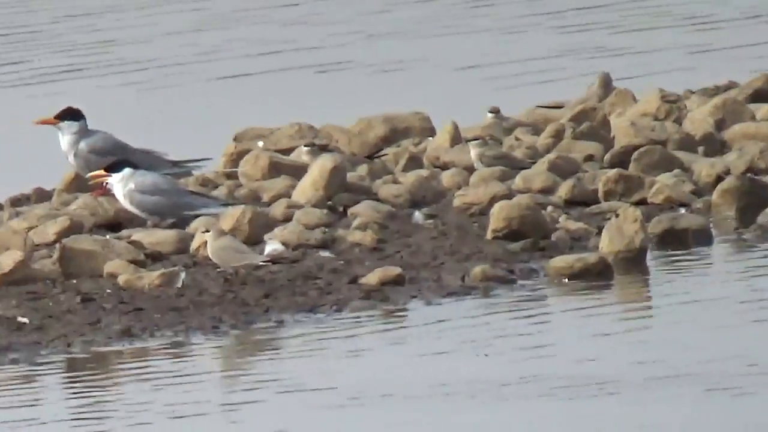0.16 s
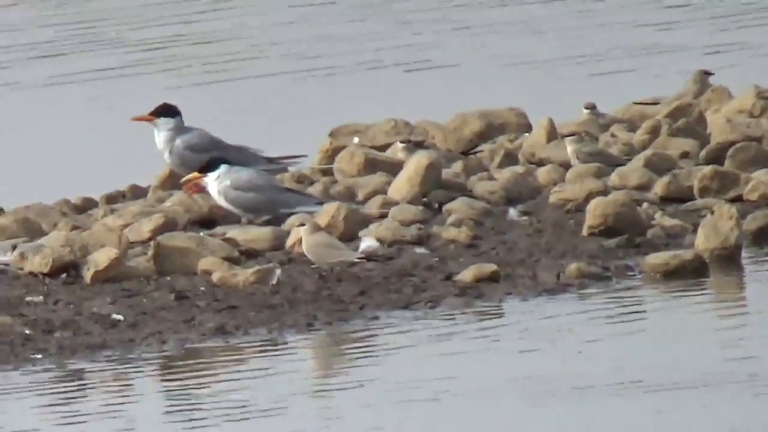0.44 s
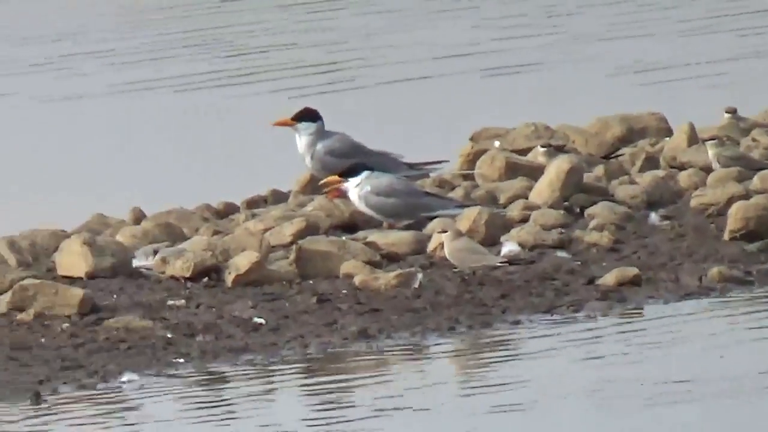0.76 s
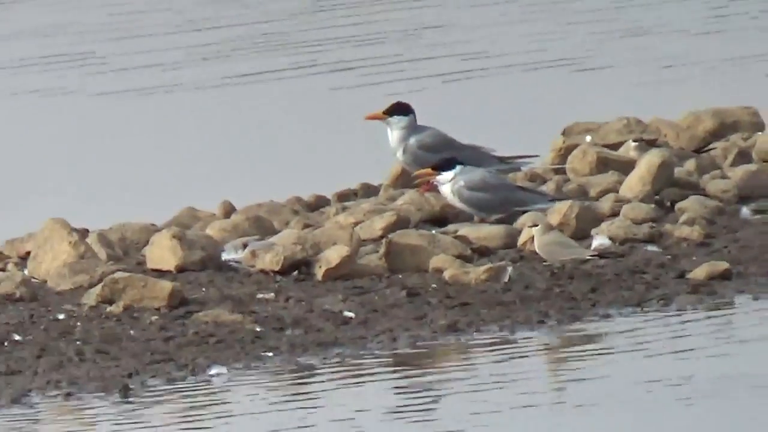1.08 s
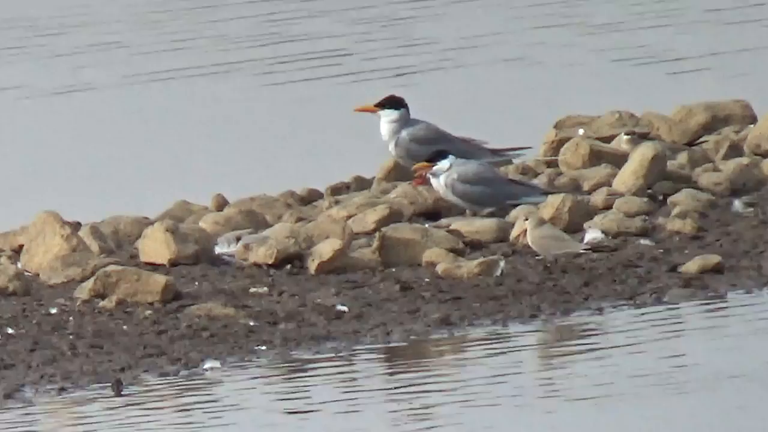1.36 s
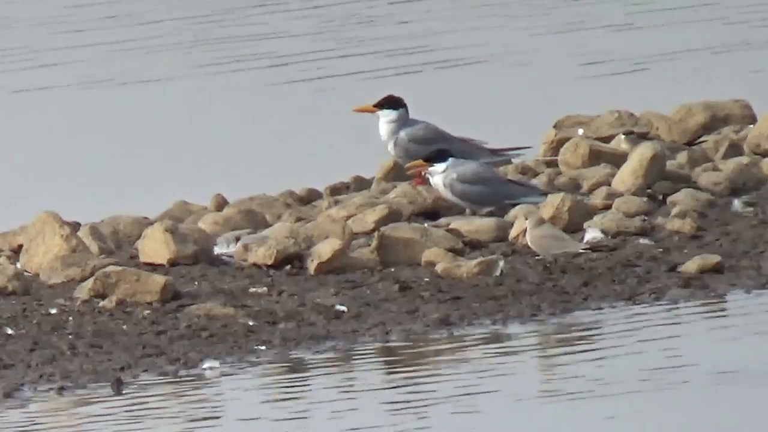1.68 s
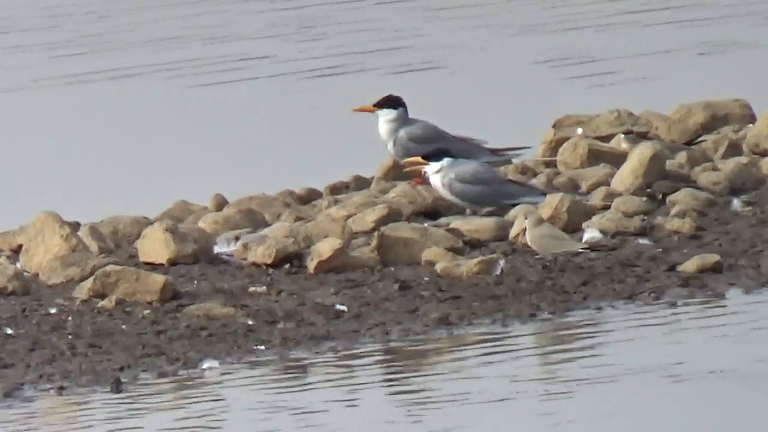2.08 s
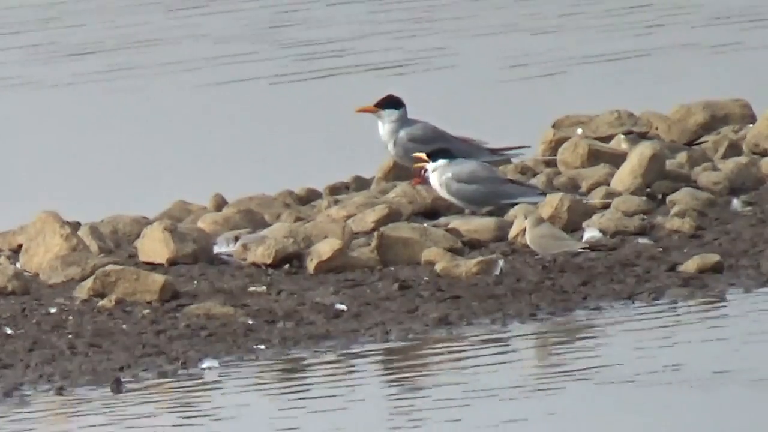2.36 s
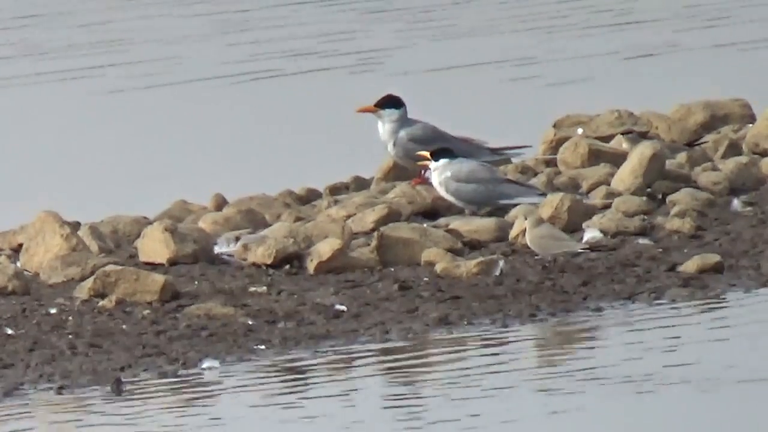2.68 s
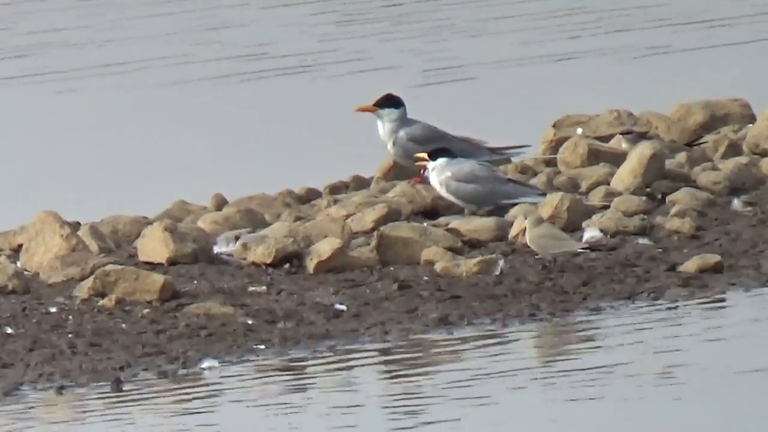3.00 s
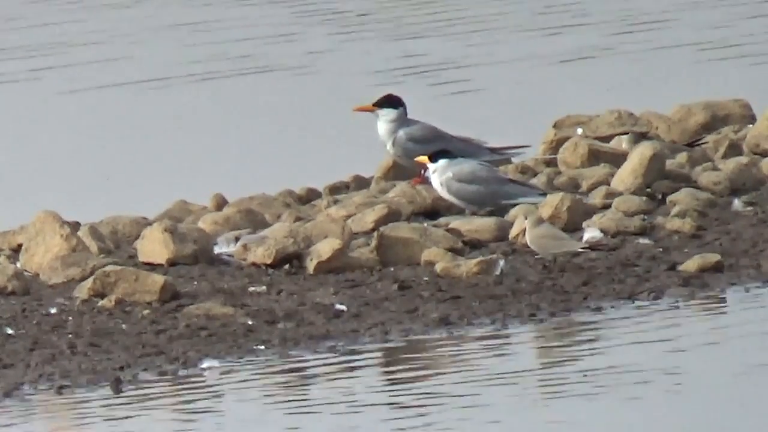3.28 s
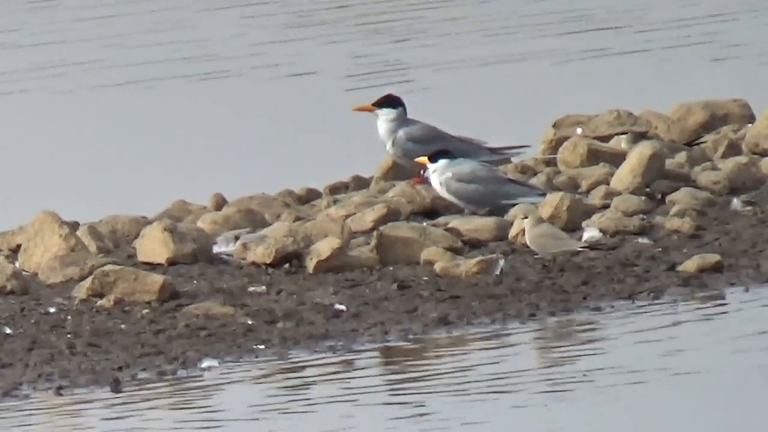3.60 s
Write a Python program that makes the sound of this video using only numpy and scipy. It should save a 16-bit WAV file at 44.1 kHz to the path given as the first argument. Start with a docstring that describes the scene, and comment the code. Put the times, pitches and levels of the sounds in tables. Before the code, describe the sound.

A tern repeats short raspy calls over soft breeze, with light handling clicks.

```python
"""A tern on a stony riverbank repeats short arched calls, a harmonic voice that ends in a rasp and is
often led by a softer rising note. Far off a small wader peeps in thin whistles; the stones scatter both.
Underneath, one low tone throbs like a faint motor in the airy hiss of breeze and river.
Handling close to the microphone adds a grainy rustle, soft knocks, scuffs, hollow bumps and snaps of
the casing, with two drip-like plinks near the start."""
import sys
import numpy as np
from scipy import signal
from scipy.fft import rfft, irfft
from scipy.io import wavfile

SR = 44100
rng = np.random.default_rng(int(sys.argv[2]) if len(sys.argv) > 2 else 0)


def wrap_up_sound(samples):
    """Save the sound to the file named by the first command line argument, as 16-bit audio."""
    columns = np.atleast_2d(samples).T
    # keep every value between -1 and 1, then stretch to whole-number steps
    tamed = np.clip(columns, -1, 1)
    steps = np.round(tamed * 32767).astype(np.int16)
    wavfile.write(sys.argv[1], SR, steps)


N = 164934

# fader ride of the hum (time [s], level [dB])
HUM_LEVEL = [(0, -53), (.2, -54), (.5, -50.5), (.72, -54), (1, -52), (1.3, -53), (1.9, -50.5), (2.43, -51),
             (2.58, -58), (2.76, -51), (3.5, -51.5), (3.74, -56)]
# how deeply the hum throbs (time [s], depth [dB])
THROB_DEPTH = [(0, -10), (.42, -20), (.9, -21), (1.55, -16), (2.3, -25), (2.7, -12.5), (3.74, -31)]
# tone colour of the air (frequency [Hz], relative level [dB])
AIR_SPECTRUM = [(25, -13), (60, -8.5), (120, -2.5), (210, 8.5), (300, 0.5), (500, -6), (1200, -7.5),
                (2500, -11), (5000, -17.5), (8000, -19.5), (11000, -28.5)]
# extra EQ on the air's side signal, shaping its width (frequency [Hz], gain [dB])
AIR_SIDE_EQ = [(60, 3), (170, -35), (260, -3), (700, 15), (1500, 11), (4000, 14)]
# noise bands of the rustle (low edge [Hz], high edge [Hz], level before the fader [dB])
RUSTLE_BANDS = [(231, 650, -69.5), (570, 1370, -64.5), (1410, 4200, -62), (4030, 8100, -64.5)]
# fader ride of the rustle (time [s], gain [dB])
RUSTLE_FADER = [(0, -7), (.25, -6), (.55, -5), (.78, -5), (1.08, -10), (1.22, -1), (1.48, 1), (1.72, -2),
                (1.85, 2.5), (2.04, 0), (2.28, 0), (2.46, 0), (2.64, -5), (2.82, -4), (3, -11), (3.74, -15)]
# fader ride of the sizzle on top of the rustle (time [s], level [dB])
SIZZLE_LEVEL = [(0, -69), (.22, -67), (.35, -71), (.62, -65.5), (.8, -69.5), (1, -72), (1.16, -76),
                (1.235, -60), (1.5, -57.5), (1.64, -63.5), (1.79, -59), (2.02, -65), (2.35, -64.5),
                (2.7, -73.5), (2.82, -69.5), (3, -77), (3.74, -76)]
# distant wader peeps (start [s], length [s], level [dB])
PEEPS = [(0.078, 0.048, -63.5), (.245, 0.039, -57), (0.417, 0.041, -59.5), (0.589, 0.038, -58),
         (0.755, 0.033, -60), (0.915, 0.031, -61), (1.094, 0.028, -62), (1.61, 0.042, -70)]
# handling knocks (start [s], body level [dB], middle level [dB], treble level [dB])
KNOCKS = [(0.0856, -85, -39, -44), (0.132, -62, -50, -66), (0.181, -50, -61, -63), (0.292, -67, -70, -49.5),
          (0.5594, -53, -49, -58), (1.653, -60, -48, -56), (1.8157, -55, -43, -41.5),
          (1.819, -55, -52, -42), (2.075, -46.5, -59, -60), (2.1017, -42, -45, -52),
          (2.1108, -50, -45, -50), (2.117, -46, -44.5, -46), (2.359, -63, -58, -48.5),
          (2.471, -40.5, -45, -67), (2.536, -45.5, -45.5, -61), (2.5576, -58, -45, -51),
          (2.809, -55, -51, -56), (2.921, -54, -44, -67)]
# body, middle and treble of a knock (low edge [Hz], high edge [Hz], T60 [s])
KNOCK_BANDS = [(477, 1740, 0.022), (1650, 4400, 0.014), (4940, 12400, 0.014)]
# drip-like ticks (start [s], level [dB], starting pitch [Hz])
PLINKS = [(0.0866, -25, 3320), (0.1642, -43, 3900)]
# tern calls (arch start [s], arch length [s], top pitch [Hz], level [dB], 3rd harmonic [dB],
# 4th harmonic [dB], 5th harmonic [dB], lead note length or 0 for none [s], lead note gain [dB]);
# harmonics are set against the 2nd, ahead of the beak resonance
TERN_CALLS = [(0.224, 0.04, 1287, -55, -9, -10, -16, 0.035, -1.5),
              (0.459, 0.046, 1280, -55, -10, -9, -16, 0.031, -5),
              (.596, 0.039, 1288, -55, -11, -8, -15, 0.017, -7),
              (0.842, 0.038, 1300, -56, -10.5, -11, -15, 0.026, -4),
              (.919, 0.035, 1264, -57, -9, -6, -11, 0.0036, -4),
              (1.178, 0.043, 1307, -51, -18, -1.5, -21, 0.02, -3.5),
              (1.435, 0.045, 1312, -49.5, -23, -0.5, -26, 0.023, -4.5),
              (1.826, 0.049, 1259, -50.5, -28, -2, -28, 0.026, -5),
              (1.913, 0.039, 1283, -51.5, -23, -2, -13, 0.015, -3),
              (2.204, .045, 1318, -53.5, -24, .5, -25, .023, -2.5),
              (2.285, .038, 1308, -56.5, -18, -1.5, -18, .009, -8),
              (2.533, 0.042, 1350, -57.5, -8, -7, -22, .023, -4),
              (2.612, 0.02, 1280, -63.5, -2, -13, -21, 0.0038, -3),
              (2.681, 0.032, 1310, -55.5, -8, -14, -26, 0, 0),
              (2.93, 0.047, 1343, -56.5, -9.5, -12, -23, .04, -7),
              (3.198, 0.047, 1332, -58, -9.5, -12, -15, 0.036, -5.5)]
# bright scuffs of the grip (start [s], level [dB])
SCUFFS = [(.212, -53), (0.225, -45), (0.438, -50.5), (1.792, -45), (2.104, -54), (2.1075, -47),
          (2.359, -49)]
# hollow bumps of the grip (start [s], level [dB], pitch [Hz], T60 [s])
BUMPS = [(.5595, -40, 880, 0.012), (1.816, -39.5, 694, 0.02), (2.1095, -35, 2840, 0.013),
         (2.1193, -25.5, 1770, 0.0056), (2.1235, -37.5, 1750, 0.016), (2.432, -49, 795, 0.024),
         (2.449, -41, 680, 0.03), (2.4712, -42.5, 773, 0.042), (2.922, -46, 1050, 0.021),
         (3.213, -50, 385, .07), (3.221, -52, 696, 0.051), (3.222, -44.5, 487, 0.048)]
# sharp snaps of the casing (start [s], peak level [dB])
SNAPS = [(2.0824, -45), (2.0869, -19), (2.098, -39)]
# ringing modes of the casing (frequency [Hz], relative level [dB], T60 [s])
CASING_MODES = [(2750, -13, 0.02), (3510, 14.5, 0.0026), (3930, 3.5, 0.0069), (6800, -6, 0.013),
                (7770, -1, 0.0042), (9060, -4.5, 0.0059), (10050, -12, 0.0051)]


def undb(db):
    """Decibels to gain."""
    return 10 ** (np.asarray(db) / 20)


def clock(length):
    """Sample times over a length in seconds."""
    return np.arange(int(length * SR)) / SR


def fader(points):
    """Gain over the whole scene from (time [s], level [dB]) points."""
    return undb(np.interp(np.arange(N) / SR, *np.array(points).T))


def add(out, start, sound):
    """Mix a sound in at a time in seconds."""
    i = int(start * SR)
    out[i:i + len(sound)] += sound[:N - i]


def drift(rate_hz):
    """Smooth random motion with unit spread."""
    hz = np.arange(N // 2 + 1) * SR / N
    motion = irfft(rfft(rng.standard_normal(N)) * np.exp(-(hz / rate_hz) ** 2), N)
    return motion / motion.std()


def band(low_hz, high_hz, order=2):
    """Unit noise between two edges."""
    bandpass = signal.butter(order, [low_hz, high_hz], "band", fs=SR, output="sos")
    noise = signal.sosfilt(bandpass, rng.standard_normal(N))
    return noise / noise.std()


def coloured(points):
    """Unit noise shaped by (frequency [Hz], relative level [dB]) points."""
    hz, db = np.array(points).T
    bins_hz = np.maximum(np.arange(N // 2 + 1) * SR / N, 1)
    eq = undb(np.interp(np.log(bins_hz), np.log(hz), db))
    noise = irfft(rfft(rng.standard_normal(N)) * eq, N)
    return noise / noise.std()


def decay(t, t60):
    """A tail that falls 60 dB in t60 seconds."""
    return np.exp(-np.log(1000) * t / t60)


def swell(t, length, attack_s=0.0029, release_s=0.0034):
    """Attack, hold and release of a bird's note."""
    return np.sin(np.pi / 2 * np.clip(np.minimum(t / attack_s, (length - t) / release_s), 0, 1))


def stereo(mid, side):
    """Left and right from mid and side."""
    return np.array([mid + side, mid - side])


def hum(pitch_hz=182.2, throb_hz=16.7):
    """One low, motor-like tone that throbs, now deeply and now lightly."""
    t = np.arange(N) / SR
    cycle = 2 * np.pi * throb_hz * t + 0.74 * drift(4.0)
    throb = 1 + fader(THROB_DEPTH) * (np.cos(cycle) + 0.3 * np.cos(2 * cycle))
    tone = np.sqrt(2) * np.sin(2 * np.pi * pitch_hz * t + 0.071 * drift(6.0))
    return fader(HUM_LEVEL) * throb * tone


def air(level_db=-60, side_db=-14.5):
    """A steady bed of breeze and river hiss, narrow in the bass and wider above."""
    eq_hz, eq_db = np.array(AIR_SIDE_EQ).T
    side_spectrum = [(hz, db + np.interp(np.log(hz), np.log(eq_hz), eq_db)) for hz, db in AIR_SPECTRUM]
    gain = undb(level_db + .5 * drift(7.5))
    return gain * stereo(coloured(AIR_SPECTRUM), undb(side_db) * coloured(side_spectrum))


def rustle(side_db=-13.0, grain_db=2, flicker_db=.8):
    """Grainy rubbing near the microphone, with a fine sizzle on top."""
    grain = undb(grain_db * drift(380) + flicker_db * drift(23.0))
    grain /= np.sqrt(np.mean(grain ** 2))
    body = sum(undb(db) * stereo(band(low_hz, high_hz), undb(side_db) * band(low_hz, high_hz))
               for low_hz, high_hz, db in RUSTLE_BANDS)
    sizzle = stereo(band(8950, 10940, order=3), undb(side_db) * band(8950, 10000, order=3))
    return grain * (body * fader(RUSTLE_FADER) + sizzle * fader(SIZZLE_LEVEL))


def wader(pitch_hz=2980, drop_hz=254, settle_s=0.0083):
    """Thin, pure whistles that drop onto a steady pitch."""
    out = np.zeros(N)
    for start, length, db in PEEPS:
        t = clock(length)
        hz = pitch_hz + drop_hz * np.exp(-t / settle_s)
        add(out, start, undb(db) * swell(t, length) * np.sin(2 * np.pi * np.cumsum(hz) / SR))
    return out


def bank_scatter(birds, wet_db=-16.5, t60=0.22):
    """The stones throw back a faint, short reverb, different in each ear."""
    t = clock(.3)
    tails = rng.standard_normal((2, N))[:, :len(t)] * decay(t, t60)
    wet = [signal.fftconvolve(birds, tail / np.linalg.norm(tail))[:N] for tail in tails]
    return undb(wet_db) * np.array(wet)


def knocks():
    """Dry handling knocks: three bands of noise, the lowest ringing longest."""
    out, t = np.zeros(N), clock(.05)
    for k, (low_hz, high_hz, t60) in enumerate(KNOCK_BANDS):
        envelope = np.zeros(N)
        for start, *levels_db in KNOCKS:
            add(envelope, start, undb(levels_db[k]) * decay(t, t60))
        out += envelope * band(low_hz, high_hz)
    return out


def plinks(t60=0.009, rise_hz_per_s=350000):
    """Drip-like ticks: a tiny ring that sweeps upwards as it dies."""
    out, t = np.zeros(N), clock(.06)
    for start, db, hz in PLINKS:
        attack = 1 - np.exp(-t * hz)
        chirp = np.sin(2 * np.pi * (hz + rise_hz_per_s * t / 2) * t)
        add(out, start, undb(db) * attack * decay(t, t60) * chirp)
    return out


def tern_voice(hz, phase, colour_db, beak_hz=3273, beak_width_hz=403, beak_db=15.5):
    """Eight harmonics through the beak's resonance, which lifts the third as the pitch falls."""
    third_db, fourth_db, fifth_db = colour_db
    harmonics_db = [-8.5, 0, third_db, fourth_db, *(fifth_db - 0.5 * np.arange(4))]
    voice = np.zeros(len(hz))
    for k, db in enumerate(harmonics_db, 1):
        lift_db = beak_db * np.exp(-((k * hz - beak_hz) / beak_width_hz) ** 2)
        voice += undb(db + lift_db) * np.sin(k * phase)
    return voice


def tern(crest_share=.37, end_fall=.18, rasp_db=-4, lead_gap_s=.004, shimmer=.2):
    """Most calls open on a rising note and a break; then an arch catches, crests and falls into a rasp."""
    out, wobble, flutter = np.zeros(N), drift(500), drift(250)

    def sing(start, hz, db, colour_db, jitter):
        """Lay in one note, roughened by fast tremors of pitch and level."""
        t = np.arange(len(hz)) / SR
        span = slice(int(start * SR), int(start * SR) + len(hz))
        phase = 2 * np.pi * np.cumsum(hz * (1 + jitter * wobble[span])) / SR
        envelope = undb(db) * swell(t, len(hz) / SR) * (1 + shimmer * flutter[span])
        add(out, start, envelope * tern_voice(hz, phase, colour_db))

    for start, length, top_hz, db, *colour_db, lead_s, lead_db in TERN_CALLS:
        t = clock(length)
        past_crest = (t / length - crest_share) / (1 - crest_share)
        arch_hz = top_hz * (1 - end_fall * np.abs(past_crest) ** 2.6)
        catch = np.exp(-t / .003)  # rough for an instant before the voice settles
        rasp = np.clip(past_crest, 0, 1) ** 4  # rough again, and softer, as the call ends
        sing(start, arch_hz, db + rasp_db * rasp, colour_db, jitter=.006 + .025 * catch + .036 * rasp)
        if lead_s > 0:
            rise_hz = top_hz * np.interp(clock(lead_s), [0, lead_s], [.895, .965])
            sing(start - lead_gap_s - lead_s, rise_hz, db + lead_db, colour_db, jitter=0.018)
    return out


def scuffs(t60=0.025):
    """Brief bursts of sizzle where the grip slips."""
    envelope, t = np.zeros(N), clock(.05)
    for start, db in SCUFFS:
        add(envelope, start, undb(db) * decay(t, t60))
    return envelope * band(9370, 11000)


def bumps():
    """Hollow bumps of the grip, each one damped tone."""
    out, t = np.zeros(N), clock(.06)
    for start, db, hz, t60 in BUMPS:
        attack = 1 - np.exp(-t * hz)
        add(out, start, undb(db) * attack * decay(t, t60) * np.sin(2 * np.pi * hz * t))
    return out


def snaps(attack_s=0.00041):
    """The casing snaps and its bright modes ring for an instant."""
    out, t = np.zeros(N), clock(.06)
    ring = sum(undb(db) * decay(t, t60) * np.sin(2 * np.pi * hz * t) for hz, db, t60 in CASING_MODES)
    ring *= 1 - np.exp(-t / attack_s)
    for start, db in SNAPS:
        add(out, start, undb(db) * ring / np.abs(ring).max())
    return out


def scene():
    """Birds in the centre with their reverb, handling up close, a bed of hum and air beneath."""
    birds = tern() + wader()
    reverb = bank_scatter(birds)
    handling = knocks() + scuffs() + bumps() + snaps()
    return birds + reverb + plinks() + handling + hum() + air() + rustle()


def record(dry, cutoff_hz=11150):
    """The recorder's steep low-pass shaves off the top."""
    return signal.sosfilt(signal.ellip(10, .2, 70, cutoff_hz, fs=SR, output="sos"), dry)


dry = scene()
out = record(dry)
wrap_up_sound(out)
```